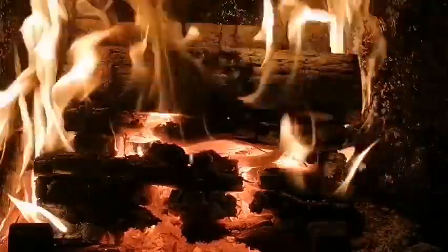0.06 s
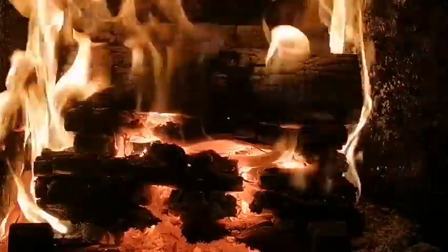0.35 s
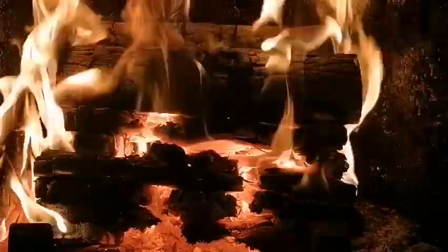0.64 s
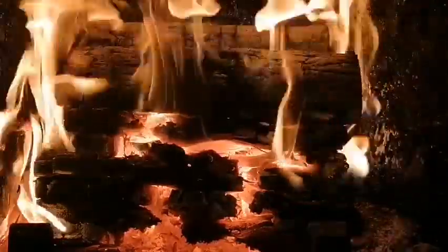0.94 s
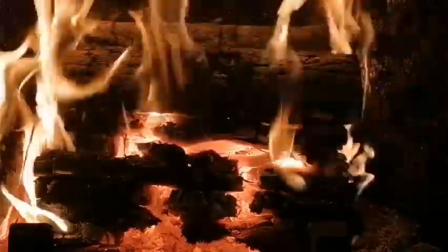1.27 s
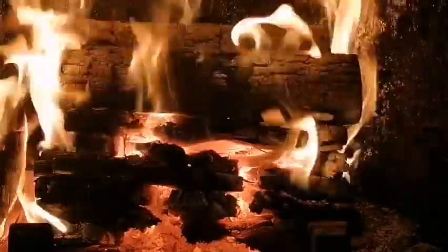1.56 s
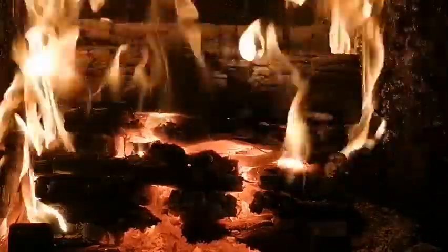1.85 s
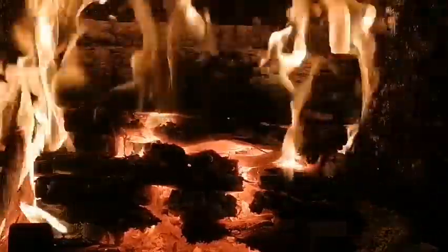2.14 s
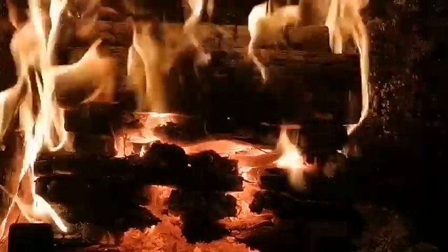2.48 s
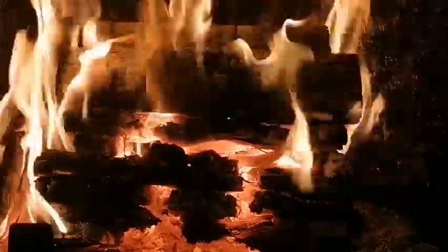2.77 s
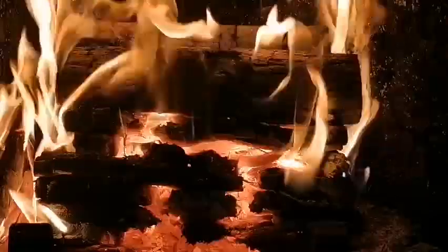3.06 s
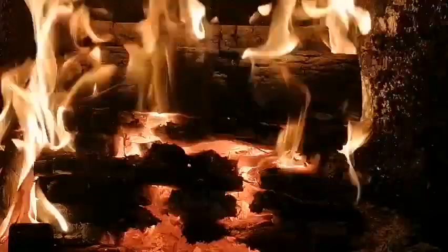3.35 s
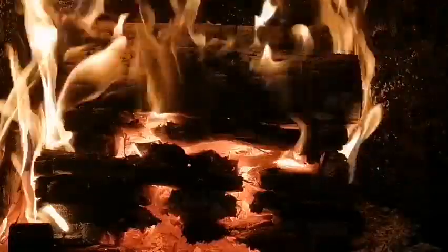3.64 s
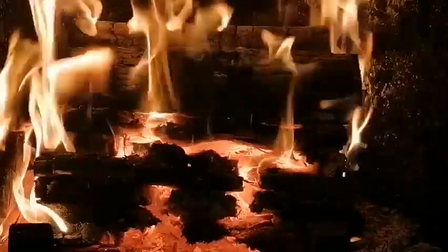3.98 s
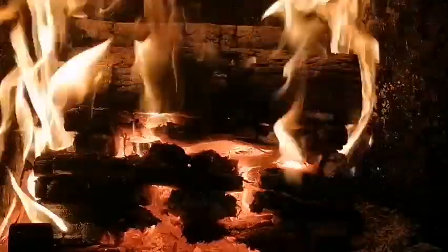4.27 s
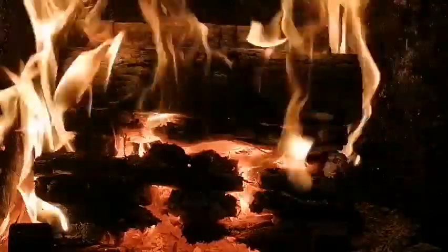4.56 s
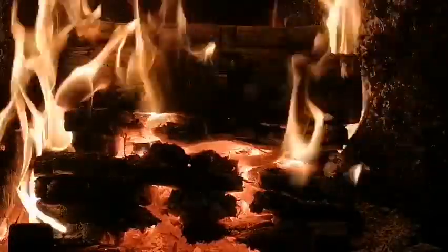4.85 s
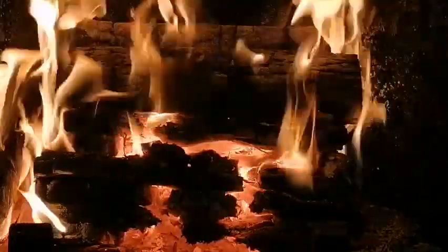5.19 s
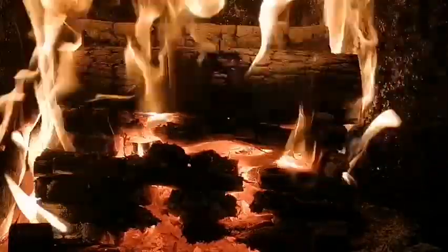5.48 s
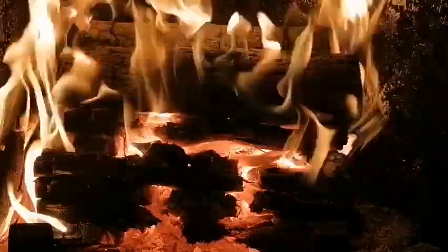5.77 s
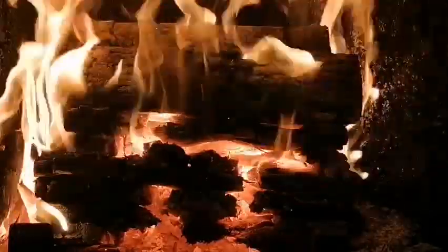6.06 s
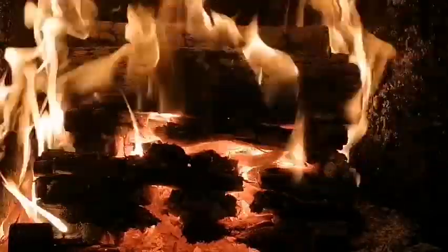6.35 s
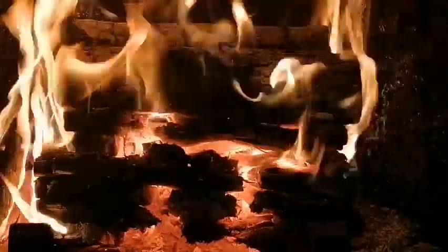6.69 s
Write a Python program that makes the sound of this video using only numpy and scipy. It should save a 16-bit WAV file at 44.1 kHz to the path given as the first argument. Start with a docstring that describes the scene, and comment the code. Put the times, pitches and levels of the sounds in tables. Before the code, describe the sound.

A sharp, woody pop sounds over the low, fluttering rumble of a log fire in a room. Tiny ticks and irregular crackles continue, with a quick cluster of loud snaps, a brief thin sizzle of sap, then two more strong snaps. The flames flare now and then with dull puffs above a soft hiss. The microphone sits close, facing the slightly hollow-sounding fireplace.

```python
"""Logs burning in an indoor fireplace

Flames rumble, flare and flap, and the firebox (the hollow around the fire) boosts some of their tones.
Pockets of steam burst as sharp snaps, and some knock the log, over tiny ticks, hiss and sizzling sap.
Each snap rattles between the firebox walls for a few milliseconds, then rings out in the room."""
import sys
import numpy as np
from scipy import signal
from scipy.fft import rfft, irfft, next_fast_len
from scipy.io import wavfile
from scipy.ndimage import map_coordinates

SR = 44100
rng = np.random.default_rng(int(sys.argv[2]) if len(sys.argv) > 2 else 0)


def dump_mix(stems):
    """Bounce the given channels to the path in sys.argv[1] as a 16-bit WAV at rate SR."""
    frames = np.atleast_2d(stems).T  # one column per channel
    limited = np.clip(frames, -1, 1)  # hard clip at full scale
    pcm = np.round(limited * 32767).astype(np.int16)
    wavfile.write(sys.argv[1], SR, pcm)


N = 305172

# the pops that stand out: (time [s], relative level [dB], centre pitch [Hz], width [octaves],
# ring pitch [Hz], ring boost [dB], left minus right [dB])
POPS = [(0.0067, -34.5, 5200, 1.2, 2720, 4, -7), (0.1556, -56, 7500, 1.6, 9500, 6, 12),
        (0.2503, -58, 3900, .8, 5770, 11, 1), (0.331, -59, 2700, 0.69, 3190, 10, 0),
        (0.4141, -60, 5150, 0.69, 3270, 7, 0), (0.4352, -51.5, 6500, 0.47, 4640, 6, -4),
        (0.522, -52, 8200, 0.83, 10600, 3, 0), (0.5412, -51.5, 4600, 0.62, 4700, 22, 2),
        (0.5511, -47.5, 6140, .4, 6130, 4, 3), (0.6909, -59, 6100, .7, 7150, 1, 2),
        (0.7355, -51, 6700, 0.85, 6900, 2, 3), (0.8096, -55.5, 7700, 0.91, 6200, -3, -4),
        (0.9989, -53.5, 4170, .5, 4650, 13, 2), (1.018, -50.5, 3300, 0.78, 2380, 7, -1),
        (1.122, -54.5, 7500, 0.96, 6500, 3, 6), (1.448, -56, 4200, 1.2, 2070, 10, -3),
        (1.497, -53.5, 2900, 1.3, 2080, 6, -2), (1.5252, -55, 3400, 0.81, 4050, 1, -2),
        (1.593, -54, 6300, .45, 5700, 10, -4), (1.6378, -45.5, 6100, 0.7, 4730, 16, -5),
        (1.9196, -61.5, 6000, 0.84, 6370, 5, 6), (2.2025, -60.5, 4100, .8, 3190, 3, 0),
        (2.257, -49, 5800, 0.73, 5900, -3, -4), (2.262, -48.5, 5500, 0.62, 6100, -3, 1),
        (2.2672, -49.5, 4300, 0.38, 4610, 21, -1), (2.3452, -54, 6300, 0.27, 6500, 5, -1),
        (2.4095, -55.5, 5800, 0.55, 5340, 0, 2), (2.6653, -53, 5300, 0.86, 5720, 11, 0),
        (2.6997, -60, 7500, 0.53, 11450, 6, 6), (2.7288, -61, 7200, .7, 10160, 6, 7),
        (2.844, -39.5, 7400, 0.92, 11350, 10, -2.5), (2.8563, -45, 7400, .9, 3150, 13, 0),
        (2.8794, -39, 6370, 0.73, 3380, 4, -2), (2.9961, -53, 4200, 0.68, 4600, 18, 0),
        (3.186, -52, 6800, 0.55, 6600, 7, 2), (3.248, -54.5, 5900, 0.93, 6550, -4, -1),
        (3.4894, -52.5, 7400, 0.76, 7060, 7, 1), (3.533, -55, 4000, .5, 4640, 14, 0),
        (3.6107, -45.5, 8200, 0.91, 9550, 8, 1.5), (3.9397, -55.5, 4600, .6, 5680, 10, 2),
        (4.0157, -53.5, 4900, 0.65, 5700, 11, 1), (4.1578, -52, 3700, 0.7, 4680, 24, 4),
        (4.466, -57, 5400, 0.54, 5250, 3, 0), (4.483, -37, 6670, 0.7, 4020, 5, -1),
        (4.6552, -37.5, 6500, 0.76, 5810, 5, 0), (4.7446, -48.5, 5200, 0.52, 5240, 12, -7.5),
        (4.8008, -51, 4800, 1, 5170, 12, 0), (4.847, -61, 4800, .65, 5170, 12, 8),
        (5.0011, -60, 5600, .75, 7920, 12, 2), (5.0124, -52.5, 4170, 1.3, 4700, 15, 0),
        (5.097, -54, 7700, 0.7, 9700, 2, -1), (5.2394, -45.5, 7800, 0.31, 10100, -8, -7),
        (5.2432, -47, 8750, 0.39, 10500, 11, -15), (5.455, -54.5, 6400, 0.58, 7150, 3, 3),
        (5.49, -57, 5100, .9, 5940, 4, -2), (5.7736, -61, 4900, 1.2, 2580, 4, 5),
        (5.839, -54, 3800, 0.86, 3170, 2, 2), (5.8657, -59.5, 2550, .65, 2670, 5, 0),
        (5.8952, -52, 4530, 0.67, 3320, 6, -2), (5.9644, -57.5, 1900, .9, 1380, 11, 2),
        (6.0117, -54.5, 4100, 0.53, 2630, 5, 1), (6.1162, -50, 5400, 0.95, 4630, 16, 3),
        (6.3907, -58.5, 5700, 0.9, 5170, 3, -3), (6.4488, -58.5, 3600, 0.55, 4570, 5, -2),
        (6.536, -55, 2000, 0.34, 2530, 12, -4), (6.566, -61.5, 3000, .8, 2300, 4, -6),
        (6.668, -48.5, 6100, .95, 4640, 5, -1), (6.686, -59, 4200, 0.38, 4700, 15, 7)]
# hiss of steam leaving the logs: (time [s], level [dB])
STEAM_LEVELS = [(0.0, -65), (0.15, -69), (1.36, -71.5), (1.56, -68.5), (2.79, -70), (3.08, -65.5),
                (4.32, -71.5), (4.72, -70.5), (6.92, -70.5)]


def amp(db):
    """Turn decibels into a number to multiply by."""
    return 10 ** (np.asarray(db) / 20)


def unit(x):
    """Scale a sound to an average (rms) level of 1."""
    return x / np.sqrt(np.mean(x ** 2) + 1e-20)


def along(points, hz):
    """Read between (frequency, value) points, on a scale of octaves."""
    freqs, values = np.transpose(points)
    return np.interp(np.log(hz + 1), np.log(freqs + 1), values)


def peak(hz, centre, half_width, steepness=2):
    """A hump that is 1 at the centre and 1/2 at half_width to either side."""
    return 1 / (1 + ((hz - centre) / half_width) ** steepness)


def swell(x, centre, width):
    """A smooth rise to 1 at the centre and the fall after it."""
    return np.exp(-2 * ((x - centre) / width) ** 2)


def wobble(per_s):
    """A smooth curve through per_s random values a second."""
    values = rng.standard_normal(int(N * per_s / SR) + 4)
    return map_coordinates(values, [np.arange(N) * per_s / SR])


def filtered(x, response):
    """Multiply each frequency of a sound by response(hz)."""
    size = next_fast_len(x.shape[-1] + SR // 4)
    hz = np.fft.rfftfreq(size, 1 / SR)
    return irfft(rfft(x, size) * response(hz), size)[..., :x.shape[-1]]


def coloured(x, gain_db, size=1024):
    """Shape the tone of a short sound, with ringing only after it, never before."""
    hz = np.fft.rfftfreq(size, 1 / SR)
    cepstrum = irfft(np.log(amp(gain_db(hz)) + 1e-6))
    fold = 1 + np.sign(size / 2 - np.arange(size))  # moves early ringing to after the sound
    fold[0] = 1
    return irfft(rfft(x, size) * np.exp(rfft(cepstrum * fold)))


def add(track, s, sound):
    """Mix a sound into the track, starting at s seconds."""
    part = track[:, max(round(s * SR), 0):][:, :sound.shape[-1]]
    part += sound[:, :part.shape[-1]]


def firebox(hz):
    """The boost in dB that the firebox and the gaps between logs give the tones they ring at."""
    # ringing tones: (pitch [Hz], width [Hz], boost [dB])
    resonances = [(89.8, 20, 3.5), (130.85, 8.4, 8.5), (195.2, 11.1, 8.5), (221.4, 24.8, 11),
                  (290.2, 7.9, 11), (322.5, 21, 7.5), (355.7, 17.5, 8.5), (412.6, 10.2, 11.5),
                  (471.4, 11.4, 5.5), (541, 20, 4), (630.5, 87, 6), (1398, 246, 6.5), (1962, 360, 7.5),
                  (2500, 224, 5.5), (2734, 84, 4.5), (3135, 370, 4.5), (3900, 120, 4), (4620, 66, 3),
                  (5820, 280, 4)]
    return sum(db * swell(hz, centre, width) for centre, width, db in resonances)


def rush(tone):
    """Rushing noise of the given tone, shaped by the firebox: narrow in the bass, wide in the treble."""
    # stereo width: (frequency [Hz], side minus middle [dB])
    spread = [(25, -19), (60, -12), (130, -20), (200, -14), (350, -11.5), (560, -6), (800, -3), (1400, -3),
              (3100, 1)]
    # balance of the ears: (frequency [Hz], left minus right [dB])
    balance = [(200, 1.86), (380, 1.5), (600, 5.5), (1100, -2), (6000, 6.5), (14000, 5)]
    size = next_fast_len(N)
    hz = np.fft.rfftfreq(size, 1 / SR)
    mid, side = rfft(rng.standard_normal((2, size)))
    width = amp(along(spread, hz))
    ears = np.array([mid + width * side, mid - width * side]) / np.sqrt(1 + width ** 2)
    gain_db = along(tone, hz) + firebox(hz) + np.outer([.5, -.5], along(balance, hz))
    return unit(irfft(ears * amp(gain_db), size)[:, :N])


def flames(rumble_db=-48.5, flutter_db=-61.5):
    """Swirling, burning gas flares now and then, with a deep rumble and a lighter flutter."""
    # flare-ups: (time of peak [s], length [s], rise [dB])
    flares = [(0.65, 0.084, 6.5), (1.425, 0.12, 6), (2.718, 0.13, 5.5), (3.53, 0.36, 3.5),
              (3.87, 0.11, 4.5), (4.054, 0.1, 6.5), (4.563, 0.091, 4.5), (6.502, 0.12, 4.5),
              (6.805, 0.073, 5)]
    # tone of each layer: (frequency [Hz], relative level [dB])
    rumble_tone = [(15, -16), (30, -18.5), (50, -9), (70, -6.5), (105, -0.5), (145, -2.5), (180, -9.5),
                   (250, -29), (400, -64)]
    flutter_tone = [(120, -23), (250, -0.5), (350, -0.5), (480, -2), (700, -6.5), (900, -7), (1150, -15),
                    (1700, -24), (3000, -21.5), (6000, -56)]
    t = np.arange(N) / SR
    draught_db = 0.96 * wobble(3.33)  # the air flow wanders slowly
    flare_db = sum(db * swell(t, s, length) for s, length, db in flares) + draught_db
    flicker = wobble(22)
    rumble = rush(rumble_tone) * amp(rumble_db + flare_db + .5 * flicker)
    waver_db = 0.24 * flare_db + 0.31 * flicker + 1.86 * wobble(60)
    return rumble + rush(flutter_tone) * amp(flutter_db + waver_db)


def steam_level():
    """The level of the escaping steam in dB, one value per sample."""
    times, levels = np.transpose(STEAM_LEVELS)
    return np.interp(np.arange(N) / SR, times, levels)


def steam():
    """Steam leaves the logs with a soft, unsteady hiss."""
    # tone of the hiss: (frequency [Hz], relative level [dB])
    hiss_tone = [(500, -20), (1200, 1), (1700, -5.5), (2100, -6.5), (3100, -4.5), (3600, -2.5), (5000, -2),
                 (6200, -2.5), (7400, -1.5), (8400, -5.5), (10000, -0.5), (11500, -9.5), (12700, -9),
                 (15000, -18)]
    return rush(hiss_tone) * amp(steam_level() + 1.33 * wobble(40))


def rattle(hold_s, fade_s, spike=5, size=400):
    """A spike, then tightly packed echoes from logs and firebox walls, different at each ear."""
    t = np.arange(size) / SR
    burst = rng.standard_normal((2, size)) * np.exp(-np.maximum(t - hold_s, 0) / fade_s)
    burst[[0, 1], rng.integers(0, 8, 2)] += spike
    return burst


def crack(burst, centre_hz, octaves, ring_hz, boost_db, jolt=0, floor_db=-18):
    """Give a burst the tone of splitting wood, with an energy of 1 at each ear."""
    # tone that all crackling shares: (frequency [Hz], relative level [dB])
    wood_tone = [(300, -29), (750, 0), (1400, 2), (1700, -1.5), (3000, -0.5), (5800, -0.5), (7300, -1),
                 (8400, -3.5), (10300, 0.5), (11400, -1.5), (12600, -10), (15000, -12.5)]
    # log tones that a hard jolt brings out: (pitch [Hz], half width [Hz], full boost [dB])
    log_tones = [(3090, 100, 5.5), (4060, 130, 6), (5940, 130, 2)]
    ring_width_hz = 210 * .5 ** (boost_db / 13)  # stronger rings are narrower, so they last longer

    def tone_db(hz):
        # the size of the split sets how high it sounds
        band = np.exp(-.5 * (np.log2((hz + 1) / centre_hz) / octaves) ** 2)
        # the opened pocket rings for a few milliseconds
        ring = 1 + (amp(max(boost_db, 0)) ** 2 - 1) * peak(hz, ring_hz, ring_width_hz)
        split_db = 10 * np.log10((band + amp(floor_db) ** 2) * ring)
        log_db = jolt * sum(db * peak(hz, pitch, width) for pitch, width, db in log_tones)
        return along(wood_tone, hz) + log_db + firebox(hz) + split_db

    sound = coloured(burst, tone_db)
    return sound / np.linalg.norm(sound, axis=1, keepdims=True)


def room(x, length_s=.6, onset_s=0.0003):
    """The room's echoes blur into a short tail that lasts longest in the lower treble."""
    # how long the room rings: (frequency [Hz], time to fade by 60 dB [s])
    fade_times = [(300, 0.061), (2800, 0.37), (6000, 0.3), (10000, 0.27), (15000, 0.21)]
    hz, t, noise = signal.stft(rng.standard_normal((2, int(length_s * SR))), SR, nperseg=256)
    fade = amp(-60 * t / along(fade_times, hz)[:, None])
    _, tail = signal.istft(noise * fade, SR, nperseg=256)
    tail *= 1 - np.exp(-np.arange(tail.shape[1]) / SR / onset_s)
    return signal.fftconvolve(x, tail / np.linalg.norm(tail[0]), axes=1)


def ticks(count, level_db, range_db, centre_hz, boost_db, room_db):
    """Small splits in the charred wood tick at random times, most of them faintly."""
    out = np.zeros((2, N))
    for when, faint, pitch, width, pan in rng.random((count, 5)):
        hz = centre_hz * 2 ** (1.7 * (pitch - .5))  # spread over 1.7 octaves
        tick = crack(rattle(hold_s=.0006, fade_s=.0007), hz, .5 + .5 * width, hz, boost_db)
        ears_db = (pan - 1.5) * np.array([[3], [-3]])  # louder on the right
        add(out, when * N / SR, tick * amp(level_db - range_db * np.sqrt(faint) + ears_db))
    return out + amp(room_db) * room(out)[:, :N]


def ticking():
    """Ticks come in flurries and swell with the steam. Deeper splits are fewer and ring more."""
    deep = ticks(count=45, level_db=-37.5, range_db=10.5, centre_hz=4000, boost_db=9, room_db=-2.5)
    fine = ticks(count=520, level_db=-38.5, range_db=15, centre_hz=9000, boost_db=4, room_db=-8)
    steam_db = steam_level()
    flurry_db = 2 * wobble(14)
    return (fine + deep) * amp(0.94 * (steam_db - steam_db.mean()) + flurry_db)


def snaps(gain_db=21.5, room_db=-6.5):
    """Steam pockets burst with loud pops. The room answers a little differently from moment to moment."""
    near, to_room, echoes = np.zeros((3, 2, N))
    click = np.ones((2, 1))
    for s, db, hz, octaves, ring_hz, boost_db, pan_db in POPS:
        ears_db = np.array([[pan_db / 2], [-pan_db / 2]])
        jolt = np.interp(db, [-53, -40], [0, 1])  # only the louder pops bring out the log's tones
        pop = crack(rattle(hold_s=.002, fade_s=.001), hz, octaves, ring_hz, boost_db, jolt)
        add(near, s, amp(db + gain_db + ears_db) * pop)
        add(to_room, s, amp(db + gain_db + room_db) * crack(click, hz, octaves, ring_hz, boost_db=0))
    for part in np.array_split(np.arange(N), 20):
        add(echoes, part[0] / SR, room(to_room[:, part]))
    return near + echoes


def log_ring():
    """The first pop gives its log a hollow knock, and close higher tones blur into a longer woody ring."""
    # ringing bands: (pitch [Hz], half width [Hz], level [dB], time to fade by 60 dB [s])
    bands = [(714, 110, -44.5, 0.04), (2630, 400, -53.5, 0.42)]
    age = np.arange(N) / SR - POPS[0][0]
    out = np.zeros((2, N))
    for centre, width, db, fade_s in bands:
        noise = rng.standard_normal((2, N))
        band = unit(filtered(noise, lambda hz: peak(hz, centre, width, steepness=4)))
        out += band * amp(db - 60 * np.abs(age) / fade_s) * (age > 0)
    return out


def flaps(rise_s=0.0053, fade_s=0.0078):
    """A flame tears off and pushes the air: a low thud with a puff of noise."""
    # tearing flames: (time [s], thud level [dB], thud pitch [Hz], puff level [dB])
    tears = [(0.518, -41, 130, -54), (0.855, -35.5, 160, -49), (1.071, -50, 130, -55),
             (1.13, -42, 130, -53), (1.274, -45, 130, -55), (1.432, -40, 100, -48), (1.456, -40, 100, -50),
             (1.468, -29.5, 106, -50.5), (1.69, -40, 130, -52.5), (2.475, -44, 130, -55.5),
             (2.726, -35.5, 160, -58), (2.831, -43, 140, -49.5), (2.896, -37, 125, -54),
             (3.264, -36.5, 120, -54), (3.472, -31.5, 105, -54), (3.69, -46, 120, -58),
             (3.835, -31, 111, -55), (4.07, -31, 111, -47.5), (4.107, -31, 113, -63), (4.58, -35, 170, -58),
             (4.612, -38, 196, -66), (5.073, -37, 155, -56), (6.455, -35, 120, -51), (6.75, -37, 120, -52),
             (6.782, -51, 120, -53), (6.832, -38.5, 121, -55)]
    # tone of the puff: (frequency [Hz], relative level [dB])
    puff_tone = [(150, 4.5), (330, 3), (480, 6.5), (650, 6), (900, -10), (2500, -40)]
    t = np.arange(-SR // 10, SR // 5) / SR
    shape = np.exp(np.where(t < 0, t / rise_s, -t / fade_s))[None]
    thuds, puff_gain = np.zeros((2, N)), np.zeros((1, N))
    for s, thud_db, thud_hz, puff_db in tears:
        hz = thud_hz * np.exp(0.044 * rng.normal())
        wave = np.sin(2 * np.pi * (hz * t + rng.random()))
        add(thuds, s + t[0], amp(thud_db) * shape * wave)
        add(puff_gain, s + t[0], amp(puff_db) * shape)
    return thuds + puff_gain * rush(puff_tone)


def knocks(onset_s=0.00048):
    """A log jolted by a pop answers with a short dull knock, slightly different at each ear."""
    # jolts: (time [s], hollow tone level [dB], woody tone level [dB])
    jolts = [(0.522, -43.5, -62), (2.261, -64, -53), (2.4097, -45, -56), (2.843, -56, -59),
             (2.8794, -54, -46), (4.4821, -60, -46), (4.6553, -62, -58), (4.744, -65, -53),
             (6.536, -44.5, -44.5)]
    # the hollow tone, then the woody one: (pitch [Hz], time to fade by 60 dB [s])
    tones = [(630, 0.016), (1390, 0.012)]
    t = np.arange(SR // 20) / SR
    onset = 1 - np.exp(-t / onset_s)
    out = np.zeros((2, N))
    for s, *levels in jolts:
        for (hz, fade_s), db in zip(tones, levels):
            pitch_hz = hz * np.exp(0.027 * rng.normal())
            cycles = pitch_hz * t + 0.12 * rng.normal(size=(2, 1))
            add(out, s, amp(db - 60 * t / fade_s) * onset * np.sin(2 * np.pi * cycles))
    return out


def sap(half_width_hz=290):
    """Sap boils out of cracks in thin, sputtering jets."""
    # jets: (time of peak [s], length [s], pitch [Hz], level [dB])
    jets = [(2.198, .4, 5700, -83), (3.271, 0.15, 5600, -67.5), (3.98, 0.2, 5700, -77),
            (4.824, 0.11, 5370, -75)]
    t = np.arange(-SR // 2, SR // 2) / SR
    out = np.zeros((2, N))
    for s, length, pitch_hz, db in jets:
        noise = rng.standard_normal((2, len(t)))
        jet = unit(filtered(noise, lambda hz: peak(hz, pitch_hz, half_width_hz)))
        sputter_db = 2 * signal.resample(rng.standard_normal(150), len(t))
        add(out, s + t[0], jet * amp(db + sputter_db) * swell(t, 0, length))
    return out


def scene():
    """The whole fire, heard from in front of the hearth."""
    return ticking() + flames() + flaps() + snaps() + knocks() + log_ring() + steam() + sap()


def record(dry, top_hz=15400):
    """Cut away the very highest treble."""
    return filtered(dry, lambda hz: 1 / np.sqrt(1 + (hz / top_hz) ** 120))


dry = scene()
out = record(dry)
dump_mix(out)
```